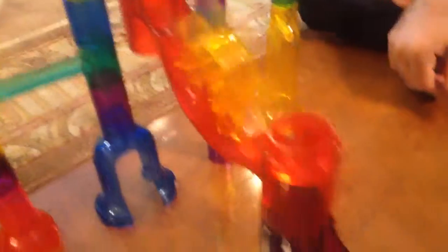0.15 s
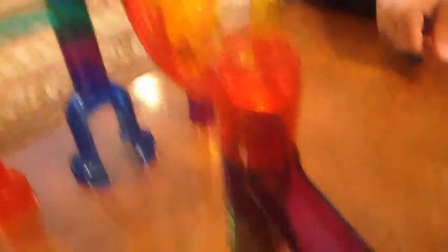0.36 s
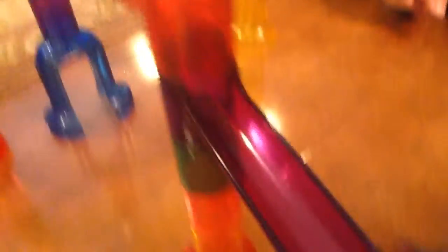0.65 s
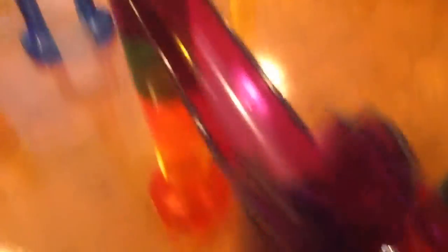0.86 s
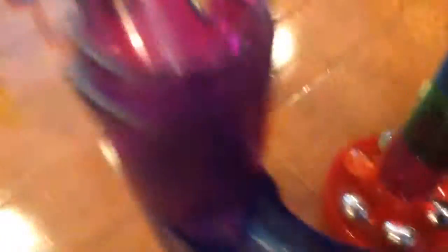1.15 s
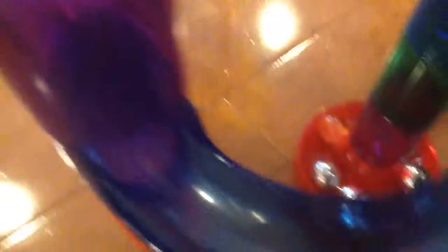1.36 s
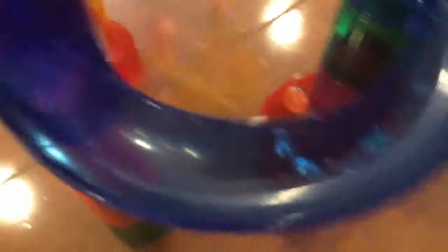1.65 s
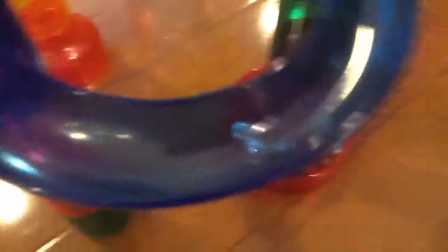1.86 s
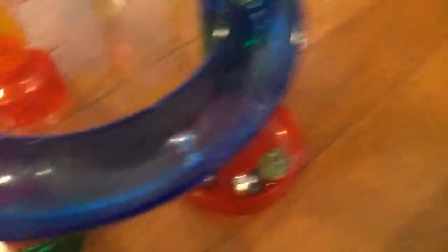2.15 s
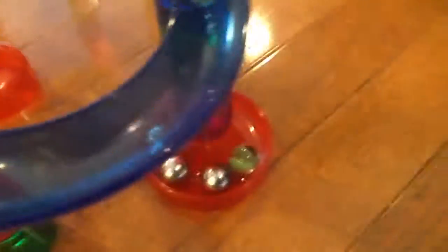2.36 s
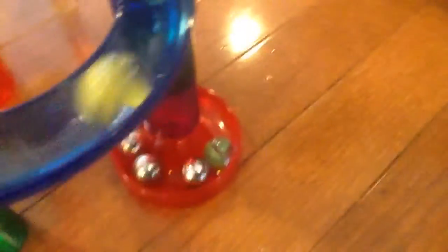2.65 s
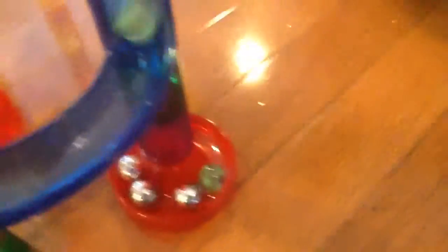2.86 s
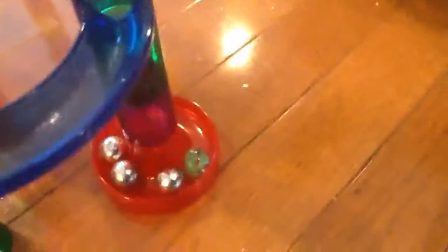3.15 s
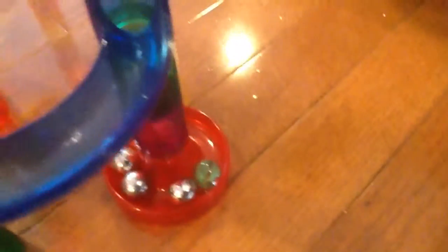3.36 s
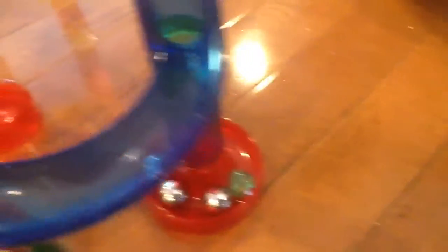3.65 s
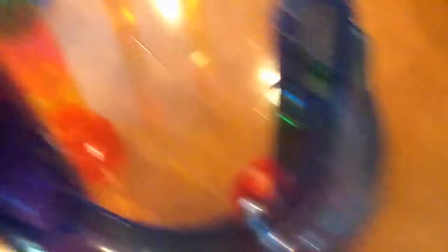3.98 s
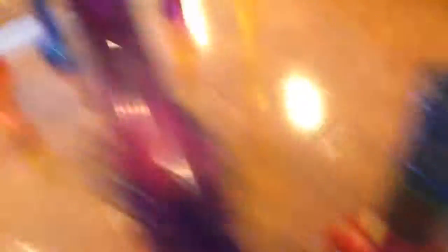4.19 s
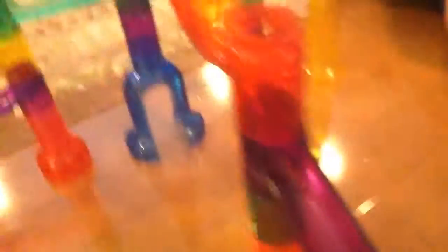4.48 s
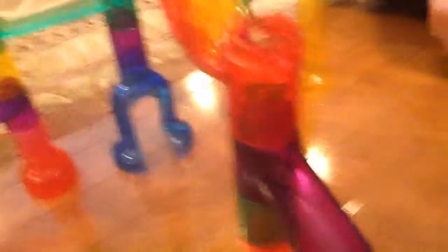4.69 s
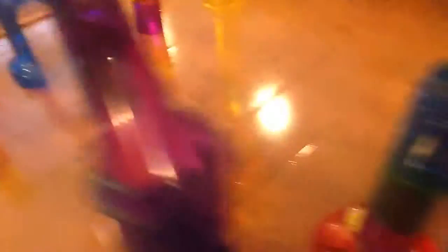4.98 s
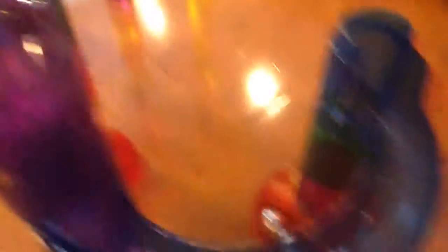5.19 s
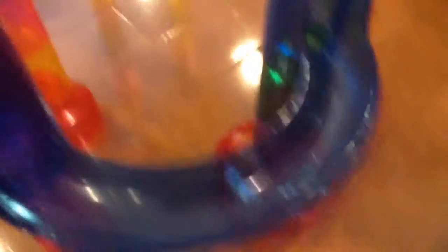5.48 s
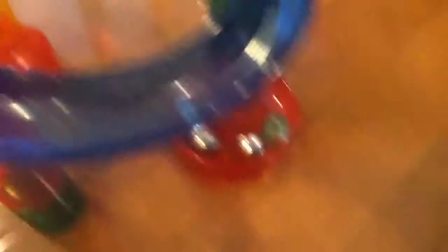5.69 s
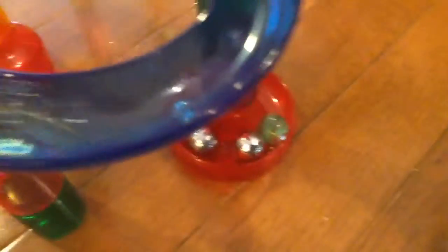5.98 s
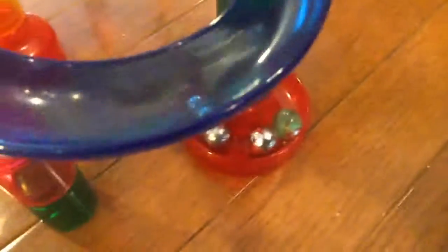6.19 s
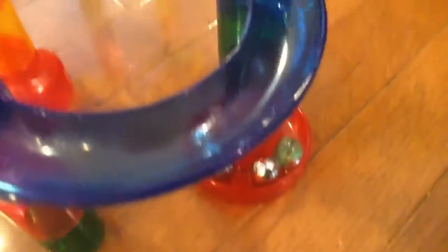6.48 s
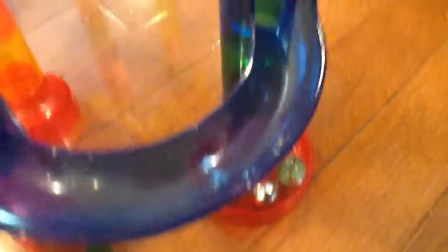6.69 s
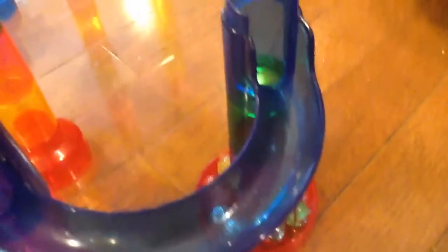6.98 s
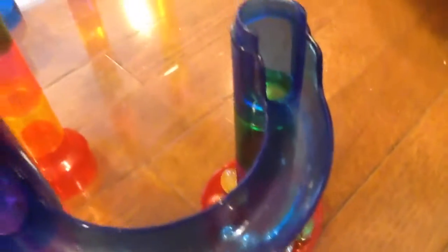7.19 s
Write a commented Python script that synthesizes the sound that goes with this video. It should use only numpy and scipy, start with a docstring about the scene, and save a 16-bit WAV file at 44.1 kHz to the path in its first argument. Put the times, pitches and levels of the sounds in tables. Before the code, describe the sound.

Marbles clatter and whir down a hollow plastic toy track in bursts of sharp clicks, with quieter rolling between and small glass clinks at the end.

```python
"""Glass marbles run down a plastic toy track in a room with a wooden floor, close to a small microphone.
Over steady faint noise they roll from the start: random contacts drive a whir in the chutes, a rumble in the
posts and a rattle in the walls. Noise bursts ring modes as knocks, crowded in drops, until about 3.2 s.
Two faint glass clinks and a quieter roll follow; knocks return from 4.0 s, in bouts near 4.8, 5.6 and 6.7 s.
Four more clinks come after 7.1 s, then the rolling fades into the noise."""
import sys
import numpy as np
from scipy import signal
from scipy.fft import rfft, irfft
from scipy.io import wavfile
from scipy.ndimage import uniform_filter1d

SR = 44100
rng = np.random.default_rng(int(sys.argv[2]) if len(sys.argv) > 2 else 0)


def transcribe(signal):
    """Save signal, clipped to [-1, 1], as a 16-bit WAV file at the path in sys.argv[1]."""
    frames = np.atleast_2d(signal).T
    limited = np.clip(frames, -1, 1)
    pcm = np.round(limited * 32767).astype(np.int16)
    wavfile.write(sys.argv[1], SR, pcm)


N = 323694

# modes of the track's support posts, thin walls and hollow elbow: pitch_hz, level_db, t60_s
POST_MODES = [(155, -4.5, 0.038), (262, 0.5, 0.022), (360, 2.5, 0.03), (472.6, -3, 0.054),
              (680, -12.5, 0.025)]
WALL_MODES = [(3510, 2, 0.004), (4243, 0, 0.004), (4910, 3, 0.007), (5590, 9, 0.01), (6080, 9, 0.01),
              (6560, 3, 0.006), (7380, -1, 0.006), (8700, -3, .003)]
ELBOW_MODES = [(1060, -5, .024), (1195, 0, .034), (1760, -6, .012), (2150, -5, .009), (2600, -3, .015)]
# marble inside the hollow elbow, which rings lower than the open chute: start_s, end_s
ELBOW_SPANS = [(1.04, 1.33), (2.9, 3.2), (6.25, 7.34)]
# a marble tumbles through a drop: start_s, length_s, rattle_db, rumble_db,
# posts_db (re chute), tilt_db_per_octave (brightness of the piece)
DROP_EVENTS = [(0.119, 0.18, -43.5, -53.5, -0.5, -11), (0.383, 0.076, -43, -65, -10, -18),
               (0.484, 0.06, -49, -62, -13, -1), (0.994, 0.2, -41, -60.5, -8.5, 13),
               (1.335, 0.43, -71, -68, -10.5, 48), (2.126, 0.25, -70, -51.5, -6, 1.5),
               (2.915, 0.18, -58.5, -75, -9, 6.5), (4.333, 0.11, -46.5, -53, -1.5, 13.5),
               (4.5, 0.15, -51.5, -56, 3, 8), (4.731, 0.23, -48, -47, -3, 16),
               (5.07, 0.023, -81, -81, 2, -2), (5.53, 0.2, -45.5, -47.5, -4.5, 13.5),
               (6.54, 0.4, -48.5, -65, -6, 9)]


def amp(db):
    """dB to gain."""
    return 10 ** (np.asarray(db) / 20)


def rms_one(x):
    """Scale to rms 1."""
    return x / np.sqrt(np.mean(x ** 2) + 1e-20)


def drift(rate_hz):
    """Slow random wander of rms 1: two-pole lowpassed noise, computed at SR / 40."""
    r = np.exp(-80 * np.pi * rate_hz / SR)
    noise = rng.standard_normal(N // 40 + 2002)
    slow = signal.lfilter([1], [1, -2 * r, r * r], noise)[2000:]   # settled part
    return np.interp(np.arange(N) / 40, np.arange(len(slow)), rms_one(slow))


def resonate(x, hz, width_hz):
    """Two-pole resonance, gain about 1 at its peak."""
    r = np.exp(-np.pi * width_hz / SR)
    feedback = [1, -2 * r * np.cos(2 * np.pi * hz / SR), r * r]
    return signal.lfilter([(1 - r * r) / 2, 0, (r * r - 1) / 2], feedback, x)


def shaken(x, resonances):
    """Parallel resonances (hz, width_hz, level_db) of alternating sign driven by x; rms 1."""
    total = sum(amp(db) * resonate(x, hz, width_hz) * (-1) ** k
                for k, (hz, width_hz, db) in enumerate(resonances))
    return rms_one(total)


def struck(modes, contact, detune, spread_db):
    """A contact rings decaying modes, each randomly detuned and weighted as pieces of track differ."""
    hz, db, t60_s = np.transpose(modes)[:, :, None]
    level_chance, pitch_chance = rng.standard_normal((2, len(modes), 1))
    t = np.arange(round(.1 * SR)) / SR
    envelope = amp(db + spread_db * level_chance - 60 * t / t60_s)
    rings = envelope * np.sin(2 * np.pi * hz * (1 + detune * pitch_chance) * t)
    sound = signal.fftconvolve(rings.sum(axis=0), contact)[:len(t)]
    loudest_power = uniform_filter1d(sound ** 2, size=180).max()
    return sound / np.sqrt(loudest_power * 5)


def hush():
    """Steady room and microphone noise: white noise shaped in frequency."""
    level_db = -58.5
    # noise spectrum, relative: hz, density_db
    spectrum = np.array([(24, -65.5), (40, -31.5), (109, 9.5), (363, -19), (422, -19.5), (503, -19.5),
                         (615, -19.5), (1340, -10), (2150, -22.5), (14100, -30), (16000, -29.5)])
    hz = np.maximum(np.arange(N // 2 + 1) * SR / N, 1)
    shape_db = np.interp(np.log(hz), np.log(spectrum[:, 0]), spectrum[:, 1])
    noise = irfft(rfft(rng.standard_normal(N)) * amp(shape_db), N)
    return amp(level_db) * rms_one(noise)


def grains(per_s, spread_db):
    """Random tiny contacts of uneven size and either sign."""
    size_db = spread_db * np.minimum(rng.exponential(1, N), 4)
    sizes = amp(size_db) * rng.choice([-1, 1], N)
    return sizes * (rng.random(N) < per_s / SR) + 1e-18


def damped(modes, width_factor):
    """Modes as resonances: the shorter the ring, the wider the band."""
    return [(hz, width_factor / t60_s, db) for hz, db, t60_s in modes]


def rolling():
    """Surface roughness shakes chute or elbow, posts and walls; the shaking comes in lumps as the marble turns."""
    fall_s, fall_db = .022, -9.5   # the marble falls free just before a drop: whir and rattle hush
    tumble_whir_db = -6.5   # re rattle
    # rolling between drops: time_s, whir_db (chute), rumble_db (posts), rattle_db (walls)
    roll_levels = [(0, -53, -45.5, -55), (0.11, -48, -54, -59), (0.45, -46, -57, -72),
                   (0.75, -56.5, -56, -57.5), (1.75, -61.5, -62, -64), (2.02, -56, -54.5, -69),
                   (2.45, -63.5, -58, -76), (2.6, -55, -56, -73), (2.76, -60.5, -58, -72),
                   (2.9, -45.5, -54, -63), (3.301, -66.5, -72.5, -80), (3.5, -56.5, -64, -69),
                   (3.78, -44, -53.5, -60), (3.99, -43.5, -55, -50.5), (4.08, -47.5, -58, -49),
                   (4.3, -61, -58.5, -56), (4.72, -66, -59.5, -79.5), (5.149, -75.5, -63, -74),
                   (5.381, -61.5, -53, -67.5), (5.901, -71.5, -62, -78.5), (6.25, -76, -60.5, -80),
                   (6.36, -69, -57.5, -67.5), (6.51, -53, -62, -69), (7.05, -76, -71, -69),
                   (7.198, -62, -66, -63), (7.34, -112.5, -80, -89)]
    # whir bands of the open chute: hz, width_hz, level_db
    whir_bands = [(1380, 95, 0), (1600, 200, -4), (1950, 300, -7), (2700, 600, -12), (3600, 900, -17)]

    t = np.arange(N) / SR
    s, *columns = np.transpose(roll_levels)
    whir_db, rumble_db, rattle_db = (np.interp(t, s, c) for c in columns)
    airborne = sum((row[0] - fall_s < t) * (t < row[0]) * 1. for row in DROP_EVENTS)
    lift_db = fall_db * uniform_filter1d(airborne, size=300)
    tumble_rattle, tumble_rumble = tumbling(t)
    whir_gain = amp(whir_db + lift_db) + amp(tumble_whir_db) * tumble_rattle
    rumble_gain = amp(rumble_db) + tumble_rumble
    rattle_gain = amp(rattle_db + lift_db) + tumble_rattle

    spans = sum((start < t) * (t < end) * 1. for start, end in ELBOW_SPANS)
    inside = uniform_filter1d(spans, size=2000)
    lumps = drift(24)
    rough, fine = grains(4000, 3), grains(900, 5)
    chute_whir = shaken(rough, whir_bands)
    elbow_whir = shaken(rough, damped(ELBOW_MODES, 1.9))
    whir = (1 - inside) * chute_whir + inside * elbow_whir
    rumble = shaken(rough, damped(POST_MODES, 5.0))
    rattle = shaken(fine, damped(WALL_MODES, 2.6))
    return (whir_gain * amp(3.0 * lumps) * whir
            + rumble_gain * amp(2.2 * drift(26)) * rumble
            + rattle_gain * amp(4.2 * lumps) * rattle)


def tumbling(t):
    """Rattle and rumble gains: each drop rises fast, holds for its length and dies away."""
    attack_s, t60_s = .02, 0.3
    gains = np.zeros((2, N))
    for s, length_s, rattle_db, rumble_db, *_ in DROP_EVENTS:
        rise = np.clip((t - s) / attack_s, 0, 1)
        fade = amp(-60 * np.maximum(t - s - length_s, 0) / t60_s)
        gains += amp([[rattle_db], [rumble_db]]) * rise * fade
    return gains


def knock_contact(chatter_s=0.003, loose_db=-25, loose_t60_s=0.055):
    """A few milliseconds of dense chatter, then uneven rebounds of marble and loose joints."""
    t = np.arange(4200) / SR
    onset = np.minimum(t / 0.00035 + 0.18, 1)
    chatter = (rng.random(len(t)) < .4) * np.exp(-(t / chatter_s) ** 2) * onset
    uneven = amp(9.5 * np.minimum(rng.standard_normal(len(t) // 100), 2))
    rebounds = np.repeat(uneven, 100) * amp(loose_db - 60 * t / loose_t60_s)
    return rng.standard_normal(len(t)) * (chatter + rebounds)


def knocks():
    """Each contact clicks in a thin wall and rings the chute or elbow, then the posts a little later."""
    default_post_db, default_tilt_db = -11.5, 0.5   # outside the drops
    post_lag_s = 0.00391
    # knocks: time_s, click_db, body_db (ring of chute and posts re click)
    knock_events = [(0.0125, -18.5, -14), (0.0256, -11, -37), (0.065, -21.5, -30), (0.1163, -18, -29),
                    (0.1198, -6, -30.5), (0.130, -16.5, -9.5), (0.1387, -3.5, -22), (0.167, -10.5, -11),
                    (0.1833, -11.5, -17), (0.191, -26, 1), (0.209, -5.5, -16), (0.2363, -24, -11),
                    (0.2669, -17, -36), (0.2744, -24, -5), (0.3845, -14, -14.5), (0.3922, -19, -4.5),
                    (0.4198, -41, -2), (0.4668, -29, 3), (0.4867, -19, -22), (0.494, -18, 7),
                    (0.5352, -29.5, 10.5), (0.644, -36.5, 3), (0.6997, -29.5, -3), (0.757, -30, -0.5),
                    (0.801, -33, 8), (0.848, -22, -8.5), (0.8875, -26.5, -3.5), (0.9322, -36.5, 13.5),
                    (1.0069, -21, -4), (1.0222, -18, -4), (1.048, -22.5, 6), (1.058, -7, -15.5),
                    (1.0739, -8, -36), (1.1062, -10, -8), (1.1205, -39, -20.5), (1.1417, -4, -36.5),
                    (1.1585, -11, -2.5), (1.1689, -37, -15.5), (1.1787, -5, -14.5), (1.2116, -8, -18.5),
                    (1.2565, -18, -19.5), (1.2788, -16.5, -17.5), (1.3119, -9, -14.5), (1.3324, -29, -5),
                    (1.3879, -7, -26.5), (1.4175, -32.5, 11), (1.4354, -25, -23), (1.4484, -14.5, -0.5),
                    (1.5304, -26.5, -26), (1.5414, -21, 1.5), (1.6122, -24, 8), (1.6214, -18.5, -12),
                    (1.6594, -17.5, -7.5), (1.6664, -16, -17), (1.6861, -20, 3), (1.9277, -44.5, 8.5),
                    (2.0735, -50.5, 12), (2.1306, -8, -14.5), (2.157, -3.5, -8), (2.1842, -16.5, -6.5),
                    (2.2444, -12.5, -1.5), (2.3007, -6.5, -12), (2.3341, -15.5, -6), (2.6265, -42.5, 5.5),
                    (2.9174, -5, -12.5), (2.9332, -12, -9.5), (2.9537, -23, -9), (2.9745, -9, -14),
                    (2.9885, -15, -36.5), (3.0011, -6.5, -9), (3.049, -5, -12.5), (3.0595, -13.5, -17),
                    (3.0724, -40, -25), (3.0884, -26, -4), (3.1155, -8.5, -15.5), (3.1388, -19, -42),
                    (3.1484, -30, 0), (3.1654, -22, -15), (3.9964, -22, 5.5), (4.0385, -31.5, 1),
                    (4.076, -34.5, 4.5), (4.1105, -27, -5.5), (4.143, -36, 9), (4.1781, -28.5, -3),
                    (4.2082, -23.5, -7), (4.2395, -25.5, -3), (4.271, -37, 9.5), (4.3293, -14, -7.5),
                    (4.3432, -41, 15), (4.3717, -38, -3), (4.3875, -8, -25.5), (4.397, -15.5, -17),
                    (4.411, -21, -11), (4.5008, -11.5, -20), (4.5618, -26.5, -17), (4.5795, -30, -4.5),
                    (4.7431, -4, -20.5), (4.7686, -27, 4), (4.7916, -9.5, -35), (4.801, -7, -8),
                    (4.8254, -13.5, -33), (4.8545, -33.5, 10), (4.8658, -19, -35), (4.9167, -17, -37),
                    (4.9284, -32, 12.5), (5.0731, -42.5, 8), (5.332, -43.5, -6), (5.5221, -4.5, -17.5),
                    (5.5494, -5.5, -6.5), (5.5777, -34, 1), (5.63, -17.5, -0.5), (5.6456, -18.5, -4),
                    (5.667, -17, -19), (5.6805, -20.5, -0.5), (5.7158, -15.5, -27), (5.7245, -22, 0.5),
                    (6.441, -49, 1), (6.4877, -42, -7.5), (6.5014, -45, -1), (6.543, -9, -10.5),
                    (6.558, -10, -11.5), (6.6069, -6, -20), (6.6175, -4.5, -20.5), (6.6512, 1, -17),
                    (6.6625, -16, -16), (6.6718, -8, -14.5), (6.6891, -9.5, -7), (6.6936, -8, -44),
                    (6.758, -13.5, -14.5), (6.7635, -20, -12), (6.8115, -10, -19), (6.8271, -6.5, -18.5),
                    (6.8827, -4.5, -16), (6.8916, -12.5, -10), (6.9024, -20.5, -11), (7.1859, -41, 2.5)]
    # modes of the open chute: pitch_hz, level_db, t60_s
    chute_modes = [(1058, -6, 0.006), (1300, -10, 0.02), (1940, -1, 0.006), (2300, 6, 0.007),
                   (2720, 0, 0.006)]

    out = np.zeros(N + SR)
    # small panels radiate no lows, nor does the open shell of a chute
    thin_wall = signal.butter(1, 3000, "high", fs=SR, output="sos")
    open_shell = signal.butter(2, 950, "high", fs=SR, output="sos")
    lag = np.zeros(round(post_lag_s * SR))
    for s, db, body_db in [*knock_events, *small_knocks()]:
        contact = knock_contact()
        here = [row[-2:] for row in DROP_EVENTS if row[0] - .02 < s < row[0] + row[1] + .02]
        post_db, tilt_db = here[0] if here else (default_post_db, default_tilt_db)
        in_elbow = any(start < s < end for start, end in ELBOW_SPANS)
        modes = ELBOW_MODES if in_elbow else chute_modes
        piece = [(hz, level_db + tilt_db * np.log2(hz / 1800), t60_s) for hz, level_db, t60_s in modes]
        shell = struck(piece, signal.sosfilt(open_shell, contact), .035, 2.5)
        posts = struck(POST_MODES, np.r_[lag, contact], .05, 3)
        click = struck(WALL_MODES, signal.sosfilt(thin_wall, contact), .04, 2.5)
        sound = click + amp(body_db) * (shell + amp(post_db) * posts)
        at = round(s * SR)
        out[at:at + len(sound)] += amp(db) * sound
    return out[:N]


def small_knocks(count=3):
    """Lesser knocks fall at random moments within each drop."""
    over_rattle_db, spread_db, body_db = 15, 4, -8   # body re click
    chance = rng.random((len(DROP_EVENTS), count, 2))
    events = []
    for (s, length_s, rattle_db, *_), rows in zip(DROP_EVENTS, chance):
        for when, size in rows:
            time_s = s + length_s * (0.057 + .92 * when)
            click_db = rattle_db + over_rattle_db + spread_db * (2 * size - 1)
            events.append((time_s, click_db, body_db))
    return events


def room(x):
    """Noise tail that dies away, the treble first."""
    t60_s, dull_hz = 0.31, 3637
    t = np.arange(SR // 2) / SR
    white = rng.standard_normal(len(t))
    dull = signal.sosfilt(signal.butter(1, dull_hz, fs=SR, output="sos"), white)
    tail = dull * amp(-60 * t / t60_s) + (white - dull) * amp(-60 * t / (0.047 * t60_s))
    tail *= np.minimum(t / 0.0008, 1)   # the first reflections need a moment
    return signal.fftconvolve(x, tail / np.sqrt(np.sum(tail ** 2)))[:N]


def clinks():
    """Glass touches glass: two quick touches, the second half as strong, ring two short bright modes."""
    # clinks in the dish: time_s, level_db, pitch_hz
    clink_events = [(3.2307, -39, 5800), (3.485, -58, 5770), (7.1309, -22.5, 6430), (7.1654, -36, 6860),
                    (7.199, -33, 5900), (7.2419, -34.5, 6300)]
    out = np.zeros(N)
    touch = np.hanning(9) * (-1) ** (np.arange(9) // 4)
    contact = np.r_[touch, np.zeros(60), touch / 2]
    for s, db, hz in clink_events:
        sound = struck([(hz, 0, .006), (1.15 * hz, -6, .005)], contact, 0, 0)
        at = round(s * SR)
        out[at:at + len(sound)] += amp(db) * sound[:N - at]
    return out


def scene():
    """Track sounds, reverberation of the hits, noise floor; soft plastic gives little above ten kilohertz."""
    room_db = -12.5
    hits = knocks() + clinks()
    track = hits + amp(room_db) * room(hits) + rolling()
    soft = signal.sosfilt(signal.butter(4, 10800, fs=SR, output="sos"), track)
    return (soft + hush())[None]


def record(dry):
    """The small microphone loses the bass, peaks are rounded, the top is cut."""
    bass_cut_hz, top_cut_hz, ceiling = 105, 16400, .85
    thin = signal.sosfilt(signal.cheby2(4, 28, bass_cut_hz, "high", fs=SR, output="sos"), dry)
    rounded = ceiling * np.tanh(thin / ceiling)
    return signal.sosfilt(signal.cheby2(12, 60, top_cut_hz, fs=SR, output="sos"), rounded)


dry = scene()
out = record(dry)
transcribe(out)
```